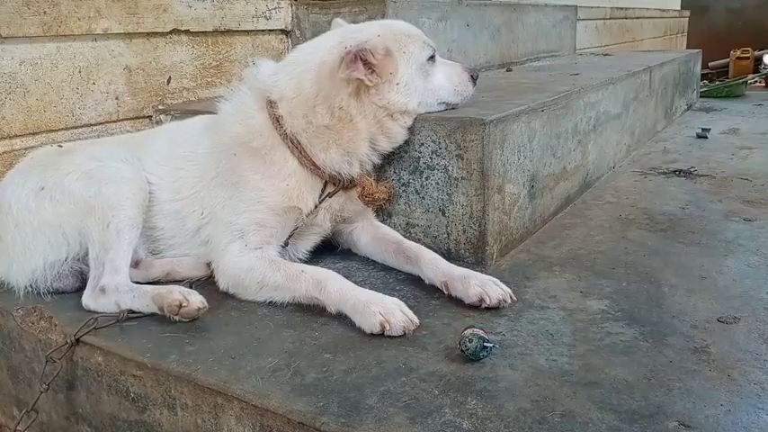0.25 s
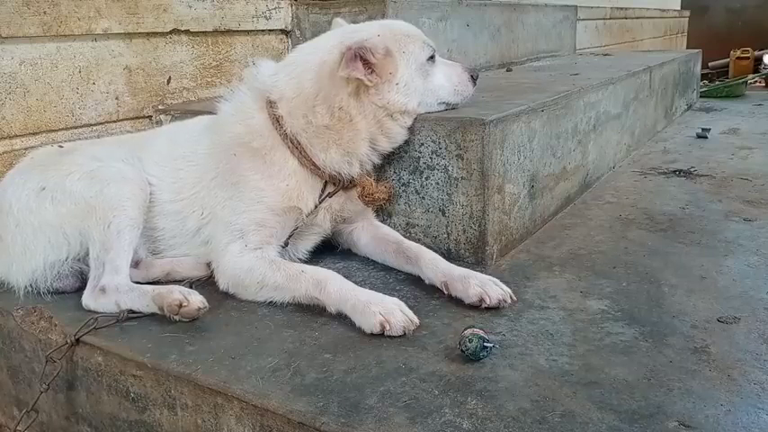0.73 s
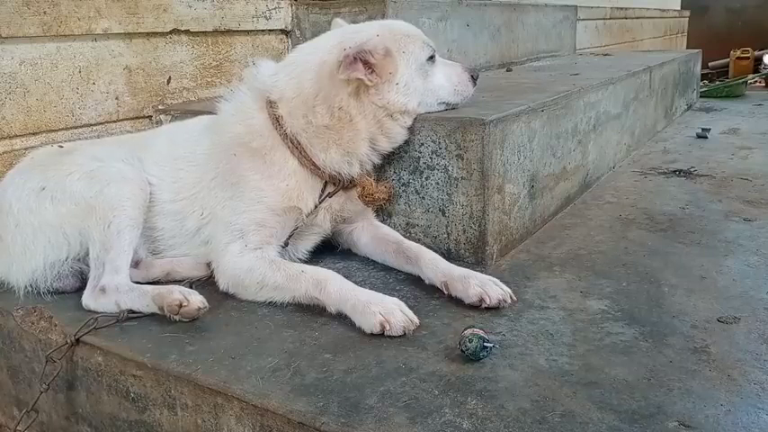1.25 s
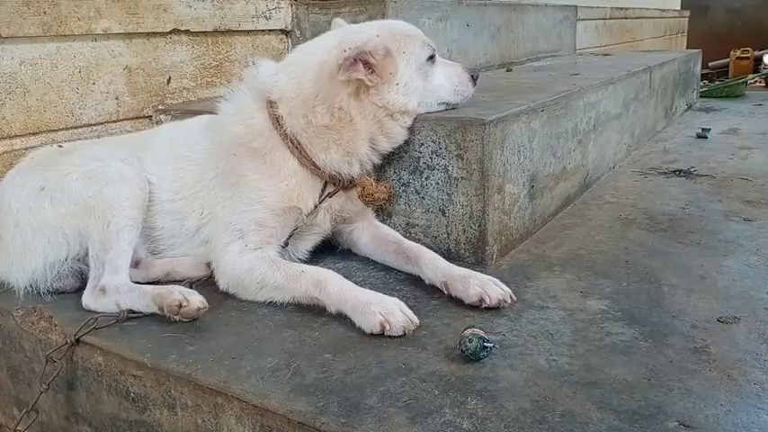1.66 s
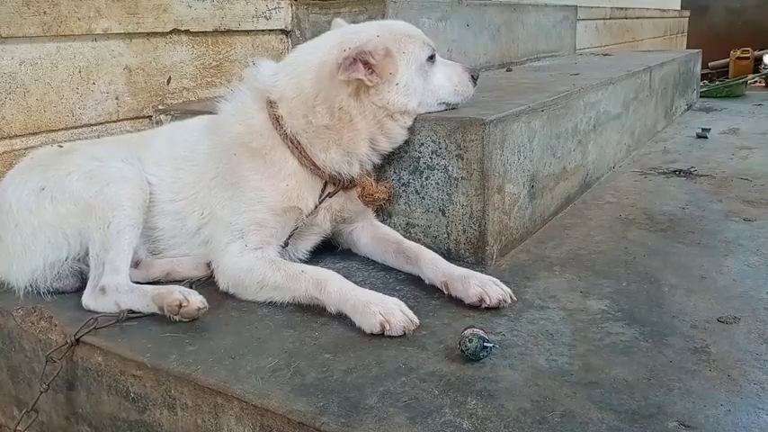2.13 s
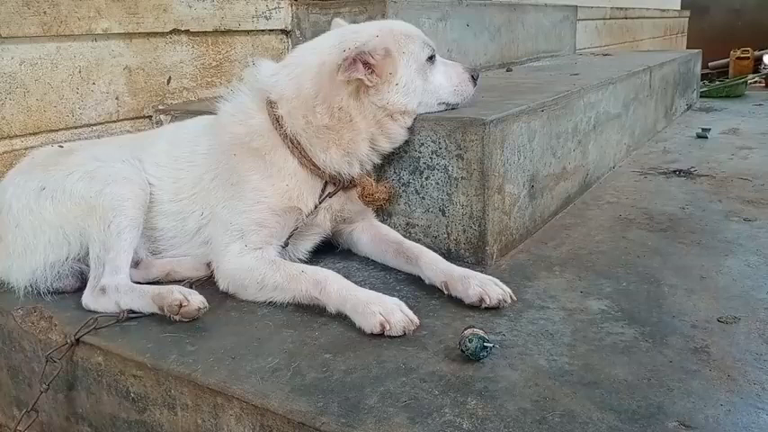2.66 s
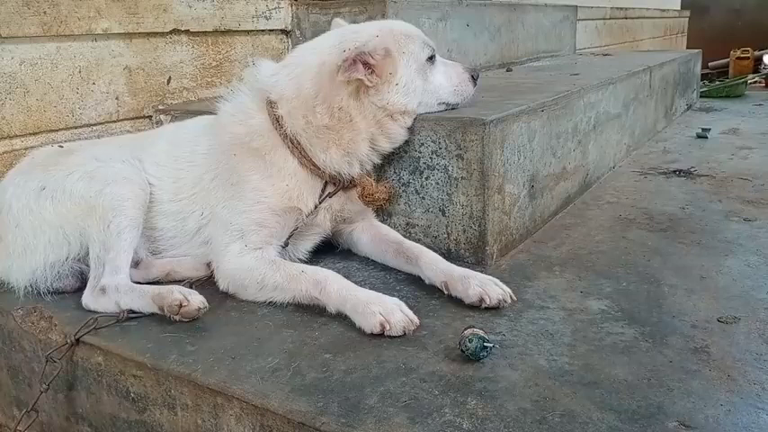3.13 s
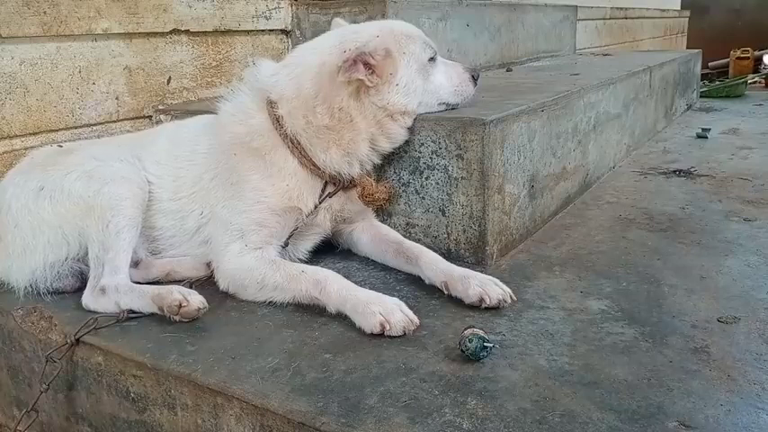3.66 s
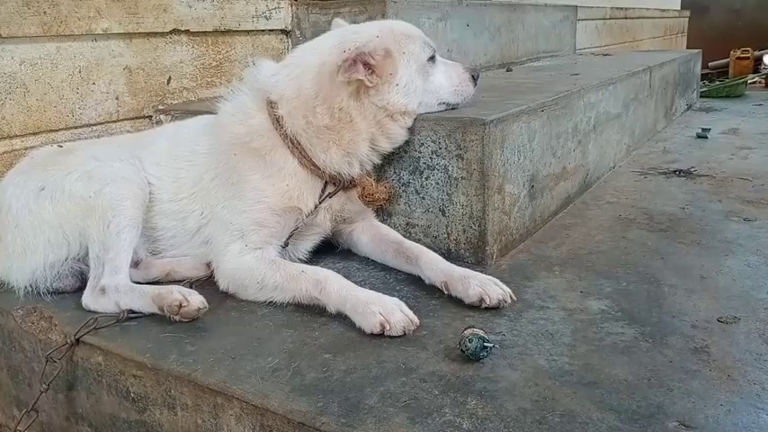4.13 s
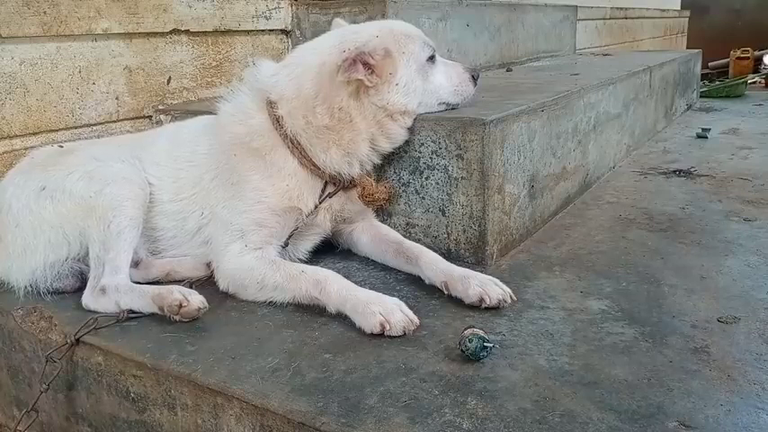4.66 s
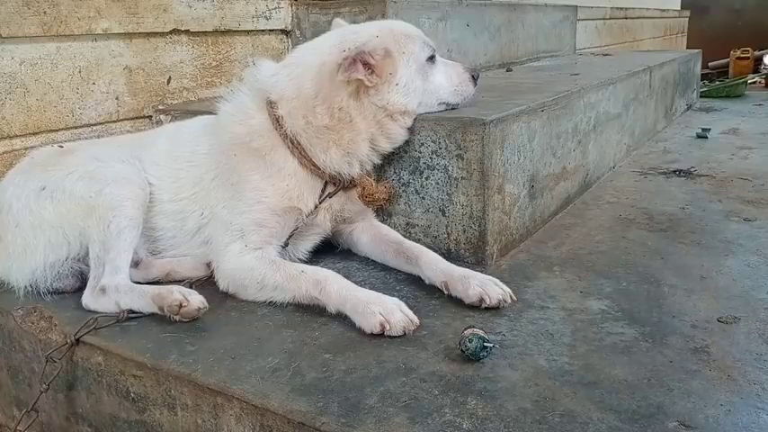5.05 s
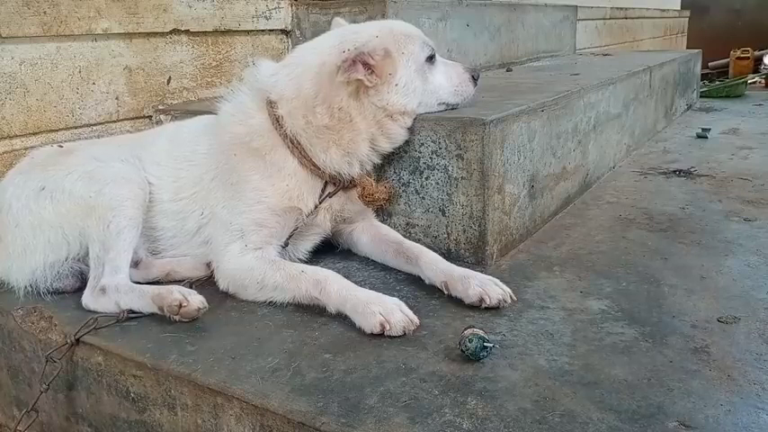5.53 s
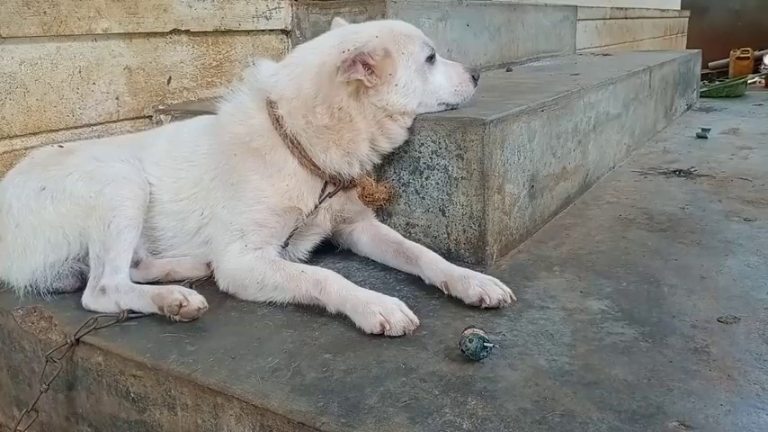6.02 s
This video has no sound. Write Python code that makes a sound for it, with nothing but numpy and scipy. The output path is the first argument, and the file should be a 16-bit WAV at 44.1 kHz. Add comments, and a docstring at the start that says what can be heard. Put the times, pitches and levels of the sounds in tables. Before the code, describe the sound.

Dry card rubs and sharp clicks of a handled matchbox lead to a gritty strike and a short hissing flare in a quiet insect-filled yard.

```python
"""A low rumble, the hush of open air and an insect chorus come first, made of shaped random noise.
Faint distant calls and a thin wavering whistle join them: soft swells and a fluttering tone.
Close by on stone steps a matchbox is handled: tiny slips and rattles ring through card, box and hands.
A match is struck with bursts of gritty noise and small pops. The head flares with a hiss in three bands,
coloured by a moving reflection, murmurs, and dies down after a second."""
import sys
import numpy as np
from scipy import signal
from scipy.fft import rfft, irfft, next_fast_len
from scipy.io import wavfile
from scipy.ndimage import uniform_filter1d, map_coordinates

SR = 44100
rng = np.random.default_rng(int(sys.argv[2]) if len(sys.argv) > 2 else 0)


def digitize_waveform(pressure):
    """Quantize a signal to 16-bit integers and store it at the path in sys.argv[1].

    Rows of a 2-D input are taken as channels; values are limited to [-1, 1].
    """
    field = np.atleast_2d(pressure).T
    bounded = np.clip(field, -1, 1)
    quanta = np.round(bounded * 32767).astype(np.int16)
    wavfile.write(sys.argv[1], SR, quanta)


N = 277080  # length in samples

# The flame's reflection. Each row: time in seconds, spacing of the reinforced frequencies in Hz.
REFLECTION = [(5.2, 1300), (5.33, 1271), (5.45, 967), (5.6, 899), (6.1, 844)]
# When the steady burn begins and when the head is spent, in seconds; then the final fade in dB per second.
BURN_S, SPENT_S, SPENT_DB_PER_S = 5.215, 6.105, 449


def amp(db):
    """Turn decibels into a multiplying factor."""
    return 10 ** (np.asarray(db) / 20)


def unit(x):
    """Scale a sound to an average (rms) strength of 1."""
    return x / np.sqrt(np.mean(x ** 2) + 1e-20)


def along(points, hz):
    """Read a curve of (Hz, value) points, with frequency on a log axis."""
    f, v = np.transpose(points)
    return np.interp(np.log(hz + 1), np.log(f + 1), v)


def gain_curve(points):
    """Turn (Hz, dB) points into a gain that depends on frequency."""
    return lambda hz: amp(along(points, hz))


def curves(rows):
    """Give one value per sample for each column after the time."""
    s, *cols = np.transpose(rows)
    return [np.interp(np.arange(N) / SR, s, c) for c in cols]


def ramp(start, length):
    """Rise from 0 to 1 over length seconds."""
    return np.clip((np.arange(N) / SR - start) / length, 0, 1)


def wobble(rate):
    """A smooth random curve of rms 1 through `rate` random points a second."""
    knots = rng.standard_normal(int(N * rate / SR) + 4)
    return unit(map_coordinates(knots, [np.arange(N) * rate / SR]))


def filtered(x, response):
    """Change the strength and timing of each frequency in x by a response."""
    n = x.shape[-1]
    m = next_fast_len(n + 4096)
    spectrum = rfft(x, m) * response(np.fft.rfftfreq(m, 1 / SR))
    return irfft(spectrum, m)[..., :n]


def causal(gain):
    """Give a gain the minimum-phase timing of a ring that starts at the blow, not before it."""
    cepstrum = irfft(np.log(np.maximum(gain, 1e-6)))
    half = len(cepstrum) // 2
    cepstrum[1:half] *= 2
    cepstrum[half + 1:] = 0
    return np.exp(rfft(cepstrum))


def band(hz, low_hz, high_hz, order=8):
    """Let through a band of frequencies with steep edges."""
    low_edge = 1 + (low_hz / (hz + 1)) ** (2 * order)
    high_edge = 1 + (hz / high_hz) ** (2 * order)
    return (low_edge * high_edge) ** -.5


def resonance(hz, centre, width):
    """A peak of height 1, as a ringing body gives."""
    return 1 / (1 + ((hz - centre) / (width / 2)) ** 2)


def noise(gain):
    """Random noise of rms 1 with this gain over frequency."""
    return unit(filtered(rng.standard_normal(N), gain))


def grains(rate, spread_db):
    """Tiny impulses of widely varying size at random moments, about `rate` a second."""
    sizes = amp(spread_db * np.clip(rng.standard_normal(N), -2, 2)) * rng.choice([-1, 1], N)
    return unit(sizes * (rng.random(N) < rate / SR))


def patchy(x, depth_db, width_hz, life):
    """Make narrow bands of x stronger or weaker for a moment, at random."""
    hz, t, z = signal.stft(x, SR, nperseg=1024)
    knots = rng.standard_normal((400, 400))
    grid = np.meshgrid(hz / width_hz, t / life, indexing="ij")
    field = map_coordinates(knots, grid, mode="wrap")
    return signal.istft(z * amp(depth_db * field), SR, nperseg=1024)[1][:N]


def add(track, s, sound):
    """Mix a sound into a track at time s."""
    part = track[round(s * SR):][:len(sound)]
    part += sound[:len(part)]


def background():
    """Low rumble that drops away, the fading hush of open air and a swelling insect chorus, all noise."""
    # Each row: time in seconds, level in dB.
    rumble_level = [(0, -73), (.13, -64), (.35, -71), (.9, -69), (1.6, -74), (1.87, -65.5), (2.5, -68.5),
                    (2.75, -82), (6.28, -82)]
    chorus_level = [(0, -72), (.9, -75), (1.2, -69), (2.3, -67.5), (4.85, -73), (6.28, -69.5)]
    # Tone of rumble, open air and insects. Each row: frequency in Hz, relative strength in dB per Hz.
    rumble_tone = [(25, -17), (38, -9), (50, 1), (70, 5), (100, 0), (140, -14.5), (250, -41.5)]
    air_tone = [(60, -6.5), (100, 0), (200, -3), (270, -6), (350, -11), (600, -16), (1300, -12.5),
                (2200, -19.5), (4300, -25), (5200, -29.5), (9000, -48), (15500, -31.5)]
    insect_tone = [(5000, -35), (5900, -8), (6200, -24), (6350, -2.5), (6800, 0), (7020, -1.5), (7250, -7),
                   (8000, -14.5), (9500, -70)]
    (rumble_db,), (chorus_db,) = curves(rumble_level), curves(chorus_level)
    sway_db = 2.5 * wobble(8)
    rumble = amp(rumble_db + sway_db) * noise(gain_curve(rumble_tone))
    air = patchy(noise(gain_curve(air_tone)), depth_db=2.5, width_hz=161.4, life=0.13)
    hush_db = -69 - 0.69 * np.arange(N) / SR  # start level, and dB lost per second
    hush = amp(hush_db) * unit(air)
    chorus = patchy(noise(gain_curve(insect_tone)), depth_db=4, width_hz=220, life=0.2)
    low_and_air = filtered(rumble + hush, lambda hz: band(hz, 46, 18600, order=3))
    return low_and_air + amp(chorus_db) * unit(chorus)


def far_calls():
    """Distant calls: steady pitches smeared by the way into soft narrow swells."""
    # Each row: time of the height in seconds, level in dB, pitch in Hz, length in seconds.
    calls = [(0.436, -75.5, 1440, 0.12), (0.605, -66.5, 1376, 0.096), (1.247, -66.5, 1050, 0.055),
             (1.633, -64, 2024, 0.07), (1.84, -67, 1838, 0.18), (2.004, -61, 1466, 0.03),
             (2.377, -68, 1130, 0.09), (6.287, -63.5, 1610, 0.11)]
    t = np.arange(N) / SR
    blur = wobble(230) + 1j * wobble(230)
    swells = np.zeros(N, complex)
    for s, db, hz, length in calls:
        swells += amp(db) * np.exp(-2 * ((t - s) / length) ** 2 + 2j * np.pi * hz * t)
    return (swells * blur).real


def whistle():
    """A thin, airy tone wavers and flutters around one pitch; each of two notes fades in and out."""
    # Each row: time in seconds, pitch in Hz, level in dB.
    long_note = [(1.07, 3280, -72), (1.15, 3305, -54), (1.21, 3320, -60.5), (1.31, 3370, -61.5),
                 (1.44, 3370, -67.5), (1.67, 3450, -67.5), (1.77, 3310, -57), (1.83, 3300, -65.5),
                 (2.08, 3350, -64.5)]
    short_note = [(2.28, 3370, -65), (2.345, 3260, -71.5), (2.375, 3285, -50), (2.41, 3320, -62.5),
                  (2.59, 3330, -57)]
    fade_s = 0.038
    track = np.zeros(N)
    for note in (long_note, short_note):
        pitch, db = curves(note)
        phase = 2 * np.pi * np.cumsum(pitch + 24 * wobble(200)) / SR
        airy = wobble(220) * np.sin(phase) + wobble(220) * np.cos(phase)
        tone = unit(np.sin(phase) + .33 * airy)
        fade = ramp(note[0][0], fade_s) * (1 - ramp(note[-1][0] - fade_s, fade_s))
        flutter_db = 1.5 * wobble(60)
        track += fade * amp(db + flutter_db) * tone
    return track


def steps(x):
    """Stone steps and a wall answer briefly: a decaying tail of random echoes, different left and right."""
    # Each row: frequency in Hz, time to die away by 60 dB in seconds.
    die_away = [(300, 0.053), (2000, 0.15), (7000, 0.03), (15000, 0.042)]
    hz, t, z = signal.stft(rng.standard_normal((2, SR // 3)), SR, nperseg=256)
    decay = amp(-60 * t / along(die_away, hz)[:, None])
    tail = signal.istft(z * decay, SR, nperseg=256)[1]
    late = np.pad(x, (200, 0))[None]  # the answer starts 200 samples late
    return signal.fftconvolve(late, tail / np.linalg.norm(tail[0]), axes=1)[:, :N]


def box_colour(hz, knock_db, edge_db):
    """Dry card with the box's resonances, more or less full (knock) and sharp (edge)."""
    # The matchbox's resonances. Each row: centre in Hz, width in Hz, height in dB.
    box_peaks = [(2244, 123, 6), (2625, 204, 6), (3900, 240, 1.5), (4460, 43, -4), (4610, 91, -1.5),
                 (5280, 470, -13), (6200, 69, -23), (6880, 100, -27)]
    # Tone of the card. Each row: frequency in Hz, relative strength in dB per Hz.
    card_tone = [(300, -38.5), (550, -42), (760, -15.5), (1150, -17.5), (1800, -6.5), (2500, -3),
                 (3300, -2.5), (4900, -3.5), (6000, 0), (7200, 0), (8300, -10.5), (9500, -16),
                 (12000, -17.5), (15500, -14)]
    peaks = sum(amp(db) * resonance(hz, centre, width) for centre, width, db in box_peaks)
    shade = [(1300, knock_db), (2400, 0.006), (7000, 0.012), (10000, edge_db)]
    return amp(along(card_tone, hz) + along(shade, hz)) * (1 + peaks)


def stick(hz, s):
    """The ring of the single stick, heard only after it has left the box at 4.45 s."""
    return (s > 4.45) * amp(4.5) * resonance(hz, centre=4860, width=500)


def rubbing():
    """Each stroke is a swell of tiny slips that sound through the box and the hollow of the hands."""
    # Card sliding on card in cupped hands. Each row: time of the height in seconds, level in dB,
    # length in seconds, strength of the hands' hollow in dB.
    strokes = [(1.252, -58.5, 0.079, 29), (1.391, -46, 0.06, 11), (1.657, -62, .08, -10),
               (1.911, -57, .065, -9), (2.008, -56, 0.072, -2), (2.137, -45.5, 0.034, 3.5),
               (2.206, -47, 0.049, -2.5), (2.427, -51, 0.046, -8), (2.495, -54, 0.054, 1),
               (2.571, -47, 0.046, -9), (2.616, -40, 0.056, 6), (2.714, -54.5, 0.08, 2),
               (2.947, -48, 0.12, -25), (3.1, -37, 0.026, -17), (3.196, -36, 0.034, -19),
               (3.2204, -27, 0.0089, -6.5), (3.252, -48, 0.04, -8), (3.347, -46.5, 0.1, -28),
               (3.434, -47, 0.037, -13.5), (3.515, -39, .046, -16), (3.647, -44, 0.088, -13),
               (3.734, -43.5, 0.063, -5), (3.918, -52, 0.044, -28), (3.999, -52, 0.019, -15),
               (4.071, -48.5, 0.041, -8), (4.164, -52.5, 0.033, 14.5), (4.205, -57.5, 0.058, -4),
               (4.415, -50, 0.043, 5.5), (4.48, -53, 0.039, -45), (4.564, -56, 0.056, -2),
               (4.643, -57.5, 0.073, 2), (4.783, -56, .026, 8), (4.935, -50.5, 0.0092, 1)]
    # The hollow, lower while the hands close round the box. Each row: time in seconds, pitch in Hz.
    hollow_pitch = [(1.4, 1810), (2.65, 1860), (3.1, 1130), (3.75, 1090), (4.15, 1560), (4.8, 1770)]
    rise_share = 0.41  # a stroke swells a little faster than it fades
    muffle = 0.14  # dB of bright edge lost per dB of hollow: closed hands dull the card
    t, track = np.arange(N) / SR, np.zeros(N)
    snaps = 0.39 * grains(rate=220, spread_db=4)  # single snaps among the slips
    slips = unit(grains(rate=2000, spread_db=5) + snaps + .25 * rng.standard_normal(N))
    slips = slips * amp(1.12 * wobble(150))
    slips = unit(patchy(slips, depth_db=4.2, width_hz=260, life=.07))
    for s, db, length, hollow_db in strokes:
        part = slice(round((s - .25) * SR), round((s + .25) * SR))
        before, after = (s - t[part]) / rise_share, (t[part] - s) / (1 - rise_share)
        away = np.maximum(before, after) / length
        swell = amp(-8 * np.abs(away) ** 1.2)
        hollow_hz = np.interp(s, *np.transpose(hollow_pitch))

        def colour(hz):
            card = box_colour(hz, knock_db=-6.5, edge_db=-1 - muffle * hollow_db)
            hollow = amp(hollow_db) * resonance(hz, hollow_hz, width=820) ** 2
            return causal(card + hollow + stick(hz, s))

        rub = filtered(slips[part] * swell, colour)
        track[part] += amp(db) * rub * np.linalg.norm(swell) / np.linalg.norm(rub)
    return track


def clicks():
    """Each knock is a short rattle of contacts, combed by the spot where the box is hit."""
    # Card and sticks knocking. Each row: start in seconds, level in dB before a shared trim,
    # boost of the low knock in dB, time to die away by 60 dB in seconds.
    knocks = [(1.2486, -33, 15, .011), (1.3853, -23, -7, .04), (2.0073, -31, -16, .014),
              (2.1311, -29, -24, 0.061), (2.1675, -29, 5.5, 0.022), (2.587, -20, 15, 0.018),
              (2.5954, -21, 9, 0.014), (2.6055, -19, 8, 0.0085), (2.6184, -24, 9.5, 0.012),
              (2.682, -25, 0, .008), (2.9113, -32.5, -28, 0.041), (3.0704, -37, -22, .02),
              (3.1154, -32.5, 8, 0.011), (3.1398, -20.5, 1, 0.0071), (3.1946, -16.5, -40, 0.011),
              (3.2156, -19, 0, 0.0096), (3.2514, -29.5, -16, 0.014), (3.3084, -29, -16, 0.028),
              (3.3423, -28, -24, 0.019), (3.505, -30, -6, 0.011), (3.5199, -26.5, -8, 0.03),
              (3.6855, -25, 4, 0.019), (3.7409, -22.5, 3, 0.021), (3.7474, -23, 2, 0.019),
              (3.8871, -40.5, -24, .02), (4.0527, -29.5, -4, 0.015), (4.147, -31, 0, 0.025),
              (4.1699, -35.5, 4, 0.01), (4.1939, -31, 8, 0.01), (4.4034, -29.5, -13, 0.0086),
              (4.5311, -18, -4.5, .011), (4.6124, -25.5, -2, 0.011), (4.6174, -32, 10.5, .025),
              (4.7621, -35.5, 2, 0.023)]
    track, t = np.zeros(N), np.arange(2048) / SR
    after_ring = amp(-19 - 60 * t / .06)
    for s, db, knock_db, t60 in knocks:
        attack = 1 - np.exp(-t / 0.00043)
        blow = rng.standard_normal(len(t)) * (amp(-60 * t / t60) + after_ring) * attack
        spot = rng.uniform(.0005, .0009)  # delay of the repeated blow in seconds
        edge_db = -3.5 + 0.76 * (db + 27)  # harder knocks are brighter

        def colour(hz):
            comb = 1 + .6 * np.exp(-2j * np.pi * hz * spot)
            return comb * causal(box_colour(hz, knock_db, edge_db) + stick(hz, s))

        knock = filtered(blow, colour)
        loudest = np.sqrt(uniform_filter1d(knock ** 2, size=64).max())
        add(track, s, amp(db - 11.5) * knock / loudest)
    return track


def strike():
    """The head catches on the grit and spits: quick bursts of noise that rise fast and die away."""
    # Each row: start in seconds, level in dB, time to die away by 60 dB in seconds.
    catches = [(4.954, -45, 0.052), (4.958, -30.5, 0.02), (4.9628, -20, 0.024), (4.9657, -24.5, 0.021),
               (5.006, -37, 0.012), (5.011, -33, 0.013)]
    # Tone of the grit. Each row: frequency in Hz, relative strength in dB per Hz.
    grit_tone = [(250, -41), (400, -33), (600, -10.5), (1000, -3.5), (1400, -7), (2600, -8.5), (3350, -1),
                 (3800, -9), (5700, 2), (7800, 0), (9000, -2), (11400, -7.5), (14300, 5), (15700, -7.5)]
    force, t = np.zeros(N), np.arange(4096) / SR
    for s, db, t60 in catches:
        add(force, s, amp(db - 60 * t / t60) * (1 - np.exp(-t / 0.0015)))
    return force * noise(gain_curve(grit_tone))


def pops():
    """Small hollow pops, each a dying ring whose pitch is blurred at random."""
    # Each row: start in seconds, level in dB before a shared boost, pitch in Hz,
    # time to die away by 60 dB in seconds.
    hollow_pops = [(1.351, -51.5, 2245, 0.15), (1.386, -40, 2020, 0.062), (4.981, -37.5, 1870, 0.015),
                   (5.045, -29.5, 1850, 0.011), (5.051, -39, 1790, 0.047), (5.196, -55.5, 1740, 0.052)]
    track, t = np.zeros(N), np.arange(8192) / SR
    for s, db, hz, t60 in hollow_pops:
        phase = 2 * np.pi * np.cumsum(hz + 190 * wobble(770)[:len(t)]) / SR
        shape = amp(db + 5.5 - 60 * t / t60) * (1 - np.exp(-t / 0.00071))
        add(track, s, shape * np.sin(phase))
    return track


def burning(attack):
    """The burn takes hold, holds, and dies quickly once the head is spent."""
    spent_for = np.maximum(np.arange(N) / SR - SPENT_S, 0)
    return ramp(BURN_S, attack) * amp(-SPENT_DB_PER_S * spent_for)


def murmur():
    """The flame murmurs in one broad resonance that sinks with its reflection and slowly fades."""
    spacing, = curves(REFLECTION)
    pitch = .94 * spacing
    swirl = (wobble(260) + 1j * wobble(260)) * np.exp(2j * np.pi * np.cumsum(pitch) / SR)
    fade_db = 8 * (np.arange(N) / SR - BURN_S)
    flutter_db = 4.5 * wobble(14)
    return burning(attack=.021) * amp(-63 - fade_db + flutter_db) * unit(swirl.real)


def flare():
    """Gas jets unevenly from the head: a flash, then a burn combed by a near reflection as the match moves."""
    # Flame, hiss and fizz. Each row: low edge in Hz, high edge in Hz, flash level in dB,
    # flash fade in dB per second, burn level in dB, burn attack in seconds, burn growth in dB per second.
    jets = [(758, 2740, -52.5, 100, -59, 0.03, 3.5), (2490, 11200, -48, 58, -55.5, 0.16, 5.5),
            (9850, 15800, -50, 77, -64.5, .12, 4.5)]
    # Tone of flash and burn. Each row: frequency in Hz, relative strength in dB per Hz.
    flash_tone = [(410, -49), (700, -17), (1210, -16), (1560, -3.5), (3580, -9), (3920, -1), (7120, 2),
                  (10600, -19), (15500, -4)]
    hiss_tone = [(350, -8), (600, 6.5), (900, -5), (1500, 7), (2300, -8.5), (3100, -6), (3800, 4.5),
                 (5100, -4.5), (6400, 1.5), (7400, -2.5), (9000, -17), (10800, -26.5), (13000, -19),
                 (15500, -14.5)]
    flash_s, flash_attack_s = 4.974, 0.0065
    t, track = np.arange(N) / SR, np.zeros(N)
    spacing, = curves(REFLECTION)
    gas = unit(rng.standard_normal(N) + .5 * grains(rate=790, spread_db=3)) * amp(1.8 * wobble(70))
    gas = patchy(gas, depth_db=3.6, width_hz=220, life=.08)
    echo = map_coordinates(gas, [np.arange(N) - SR / spacing], order=3)
    echo_share = [(800, .6), (3500, .6), (6000, .35), (14000, .3)]  # (Hz, share reflected)
    combed = gas + filtered(echo, lambda hz: along(echo_share, hz))
    for low_hz, high_hz, flash_db, fade, burn_db, attack, growth in jets:
        def jet(x, tone):
            return unit(filtered(x, lambda hz: amp(along(tone, hz)) * band(hz, low_hz, high_hz)))

        flash = ramp(flash_s, flash_attack_s) * amp(flash_db - fade * np.maximum(t - flash_s, 0))
        flash *= 1 - ramp(BURN_S, attack)  # the burn takes over
        burn = burning(attack) * amp(burn_db + growth * (t - BURN_S))
        track += flash * jet(gas, flash_tone) + burn * jet(combed, hiss_tone)
    return track


def scene():
    """The match close by, the yard behind it, and a faint diffuse hiss."""
    match = rubbing() + clicks() + strike() + pops() + flare() + murmur()
    diffuse_tone = [(30, -12), (100, -8), (600, -16.5), (4000, -13.0), (9000, -20.5)]  # (Hz, dB)
    diffuse = np.array([noise(gain_curve(diffuse_tone)) for _ in range(2)])
    yard = whistle() + far_calls() + background()
    return match + yard + amp(-15.0) * steps(match) + amp(-77.5) * diffuse


def record(dry):
    """Balance left and right differently at each frequency and cut everything from 15650 Hz up."""
    # Each row: frequency in Hz, left minus right in dB.
    lean = [(60, 2.5), (300, 3), (1200, 6), (2400, 3.5), (5000, 4), (6400, 1), (7300, -6.5), (8300, -10),
            (9400, -20.5), (11400, -11.5), (12300, -4), (13500, -4.5), (15500, -0.5)]

    def ports(hz):
        ratio = amp(along(lean, hz))
        return np.array([2 * ratio, 2 + 0 * ratio]) / (1 + ratio)

    return filtered(dry, lambda hz: ports(hz) * (hz < 15650))


dry = scene()
out = record(dry)
digitize_waveform(out)
```